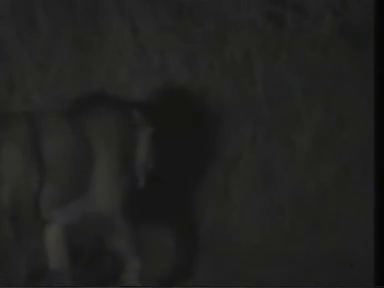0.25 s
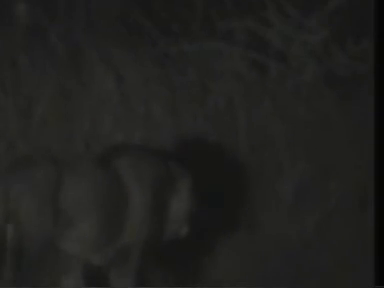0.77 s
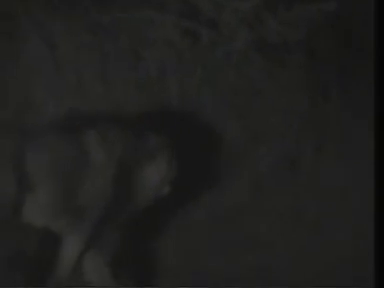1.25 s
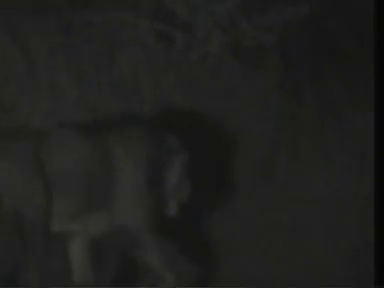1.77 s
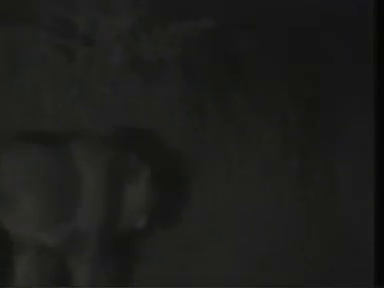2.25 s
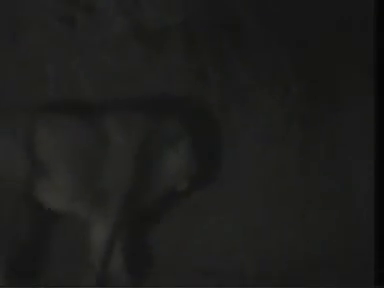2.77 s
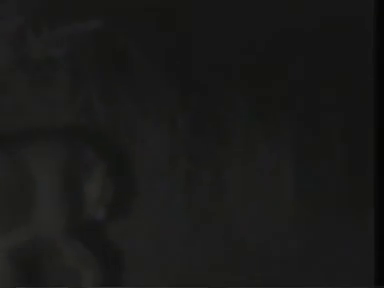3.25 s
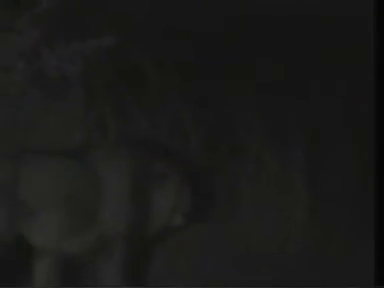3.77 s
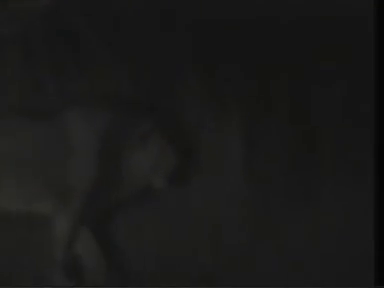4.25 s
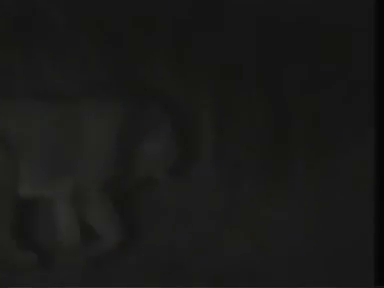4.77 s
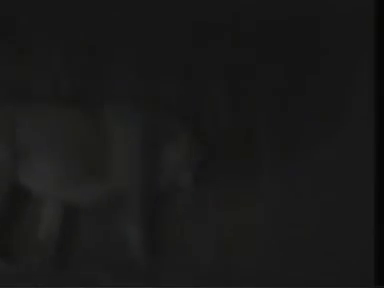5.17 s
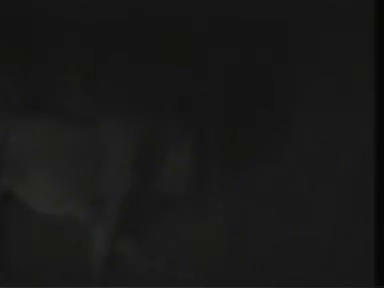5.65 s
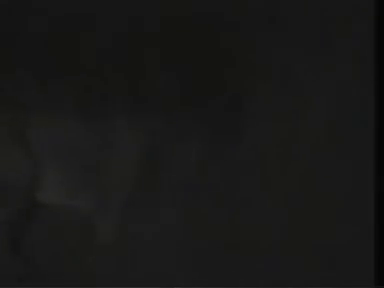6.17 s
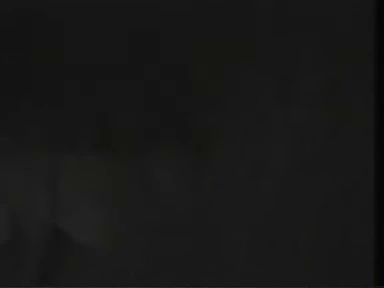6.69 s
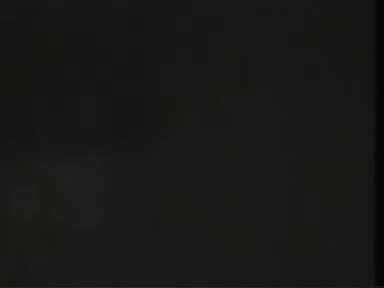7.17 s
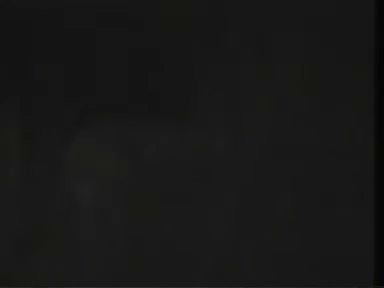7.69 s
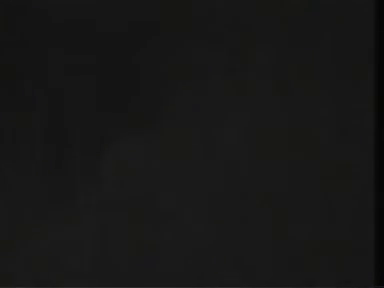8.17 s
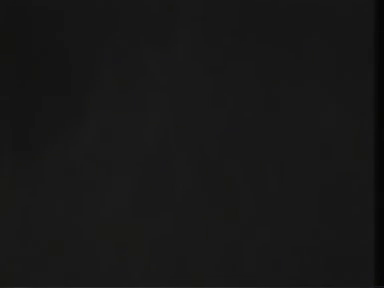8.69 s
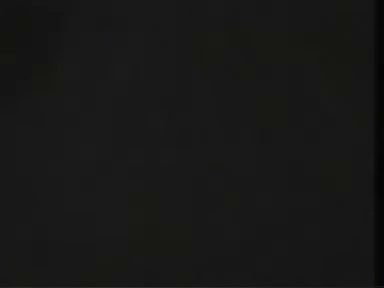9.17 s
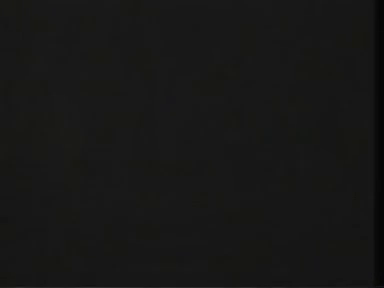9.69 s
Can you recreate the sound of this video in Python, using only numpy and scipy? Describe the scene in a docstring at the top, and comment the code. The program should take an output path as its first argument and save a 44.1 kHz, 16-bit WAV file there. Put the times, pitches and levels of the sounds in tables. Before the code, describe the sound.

In open scrub at night a lion gives three deep, rough roars, each falling in pitch and ending breathy, then eight short, throaty grunts at regular intervals. The sound is close and dry with only a brief dull echo. Near the microphone a small motor hums, whirrs and ticks softly, with a few low bumps and two clicks. Nearly everything sits on the right; the left has only faint hiss and whistle.

```python
"""A lion calls at night: three long roars, then eight short grunts. Its heavy vocal folds give a deep, nearly
pure tone; a rasp of half-pitch overtones and turbulent puffs resonates in the long throat and open mouth,
and air rushes late in each call. Near the microphone a small motor hums, whines, whirrs and ticks, built
from steady tones and shaped noise, with a few decaying bass bumps and two noise clicks. All this is on the
right, with a thin high tone; the left carries only faint electronic hiss and whistle."""
import sys
import numpy as np
from scipy import signal
from scipy.fft import rfft, irfft, next_fast_len
from scipy.io import wavfile
from scipy.ndimage import map_coordinates

SR = 44100
rng = np.random.default_rng(int(sys.argv[2]) if len(sys.argv) > 2 else 0)


def generate_wav(sig):
    """Save sig (samples, or channels by samples) to the path in sys.argv[1] as 16-bit PCM at SR."""
    pcm = np.round(np.clip(np.atleast_2d(sig).T, -1, 1) * 32767).astype(np.int16)
    wavfile.write(sys.argv[1], SR, pcm)


N = 437913

# All source levels are relative: scene() doubles their sum.
REST_HZ = 165  # pitch at which the tract resonances keep their listed frequencies


def amp(db):
    """Decibels to amplitude ratio."""
    return 10 ** (np.asarray(db) / 20)


def unit(x):
    """Normalisation to unit rms."""
    return x / np.sqrt(np.mean(x ** 2) + 1e-20)


def clock():
    """Time in seconds at every sample."""
    return np.arange(N) / SR


def wobble(rate):
    """Band-limited randomness: a smooth curve through rate random knots a second."""
    knots = rng.standard_normal(8192)
    return map_coordinates(knots, [clock() * rate], mode="wrap")


def filtered(x, response):
    """Linear filtering: the spectrum of x times a complex response of frequency."""
    m = next_fast_len(N + SR // 2)
    return irfft(rfft(x, m) * response(np.fft.rfftfreq(m, 1 / SR)), m)[..., :N]


def coloured(x, points):
    """Spectral shaping by (f/Hz, level/dB) points on a log frequency axis, at unit rms."""
    f, db = np.transpose(points)
    return unit(filtered(x, lambda hz: amp(np.interp(np.log(hz + 1), np.log(f), db))))


def resonances(modes, f):
    """Modal superposition of (f/Hz, width/Hz, level/dB) resonances of alternating sign."""
    total = 0
    for k, (centre, width, db) in enumerate(modes):
        damping = 1j * f * width
        total = total + (-1) ** k * amp(db) * damping / (centre * centre - f * f + damping)
    return total


def cavity(x, modes, low_hz, high_hz, order=1):
    """Cavity resonance between two steep band edges, at unit rms; order 2 deepens the valleys."""
    def response(f):
        low_edge = 1 - 1 / (1 + (f / low_hz) ** 6)
        high_edge = 1 + (f / high_hz) ** 6
        return resonances(modes, f) ** order * low_edge / high_edge
    return unit(filtered(x, response))


def tones(lines, drift, waver_db=0):
    """Additive synthesis of (f/Hz, rms level/dB) lines that wander by drift radians and by waver_db."""
    t, knots = clock(), np.arange(100) / 10

    def wander():
        return np.interp(t, knots, rng.standard_normal(len(knots)))

    total = 0
    for hz, db in lines:
        level = np.sqrt(2) * amp(db + waver_db * wander())
        total = total + level * np.sin(2 * np.pi * hz * t + drift * wander())
    return total


def motor():
    """Rotating machinery radiates tones, a hum that swells with its load, and whirr resonant in a casing."""
    # level of the low hum: t/s, level/dB
    hum_swell = [(0, -90), (0.8, -63.5), (2.4, -54.5), (3.5, -52.5), (5.3, -58), (7.3, -51), (8.6, -60),
                 (9.55, -50), (9.93, -56.5)]
    # lines of the hum, relative to its level: f/Hz, level/dB
    hum_lines = [(419.7, 0), (448, -11), (474, -13), (893, -13)]
    # gear whine, before its slow growth: f/Hz, level/dB
    whine_lines = [(1168, -72), (1981, -85), (2008, -69.5), (2229, -81.5), (2627, -72), (2670, -68.5),
                   (2842, -78.5), (2896, -66), (3338, -66), (3531, -72), (4005, -79), (4452, -76)]
    # motor tones that the casing lifts, before the same growth: f/Hz, level/dB
    shrill_lines = [(6207, -68), (6255, -76), (6428, -73.5), (6481, -73)]
    # spectrum of the whirr: f/Hz, relative level/dB per Hz
    whirr_spectrum = [(1060, -16.5), (1800, -8.5), (2600, -5), (3070, -4.5), (3460, -3), (3760, -9.5),
                      (5200, -15.5), (6760, -5.5), (11400, -120)]
    # casing resonances that the motor shakes: f/Hz, width/Hz, relative level/dB
    casing_modes = [(6380, 750, 0), (9580, 650, -14)]
    # two low tones that beat: f/Hz, level/dB
    drone_lines = [(147, -62), (163.5, -66.5)]
    hum = amp(np.interp(clock(), *np.transpose(hum_swell)))
    growth = amp(-4 + 0.69 * clock())  # dB, dB per s
    whirr = amp(-57) * coloured(rng.standard_normal(N), whirr_spectrum)
    whirr += amp(-66.0) * cavity(rng.standard_normal(N), casing_modes, low_hz=4100, high_hz=12100)
    gears = tones(whine_lines, drift=0.65, waver_db=3.5) + tones(shrill_lines, drift=1.0, waver_db=3.0)
    flicker = amp(1.5 * wobble(60))
    sound = hum * tones(hum_lines, drift=0.29)
    sound += growth * (gears + whirr * flicker)
    return sound + tones(drone_lines, drift=1.0)


def ticking():
    """Periodic amplitude modulation: the mechanism ticks softly and fast, most clearly at the start."""
    steady_db, extra_db, fade_s = -57, 4, 2  # the extra level at the start fades
    tick_hz, first_s = 16.8, 0.024
    t = clock()
    beats = ((1 + np.cos(2 * np.pi * tick_hz * (t - first_s))) / 2) ** 2
    spectrum = [(150, -44.5), (500, 10.5), (900, 1), (1500, -1.5), (2500, -38), (8000, -42)]
    rustle = coloured(rng.standard_normal(N), spectrum)
    return amp(steady_db + extra_db * np.exp(-(t / fade_s) ** 2)) * beats * rustle


def night():
    """Stationary coloured noise for still air, with a faint uneven rumble."""
    # spectrum of the still air: f/Hz, relative level/dB per Hz
    air_spectrum = [(20, -7.5), (40, -3), (75, -3), (120, 3), (155, 10), (200, 1.5), (500, 0), (800, -2.5),
                    (1500, -6), (2500, -14.5), (8000, -19.5), (12000, -24.5), (15000, -56)]
    rumble_spectrum = [(12, -17.5), (35, -14.5), (70, -9.5), (140, -22.5), (400, -68.5)]
    rumble = coloured(rng.standard_normal(N), rumble_spectrum)
    rumble_db = -60 - 0.7 * clock() + 3 * wobble(4.6)  # sinks by 0.7 dB per s
    return amp(-53.5) * coloured(rng.standard_normal(N), air_spectrum) + amp(rumble_db) * rumble


def knocks():
    """Impulse response: bumps push the microphone as decaying bass; clicks are a bright snap and a rattle."""
    # bumps, before a common lift: t/s, level/dB
    bump_times = [(0.204, -42), (0.406, -43), (0.558, -48), (0.872, -38), (1.93, -44.5), (2.0, -50),
                  (2.345, -41.5), (4.16, -41), (4.755, -38)]
    # clicks, before a common lift: t/s, rattle level/dB, rattle 60 dB decay time/s, snap level/dB
    click_times = [(6.493, -36.5, 0.29, -37.5), (9.38, -27.5, 0.062, -37)]
    # resonances of the duller rattle: f/Hz, width/Hz, level/dB
    rattle_modes = [(570.1, 500, 2), (1010, 640, -2.5)]
    # resonances of the snap: f/Hz, width/Hz, level/dB
    snap_modes = [(1130, 730, 0.5), (1860, 520, 1.5), (5500, 5000, -27.5)]
    bump_hz, bump_t60, bump_rise_s, snap_t60 = 54.3, 0.094, 0.0017, 0.064
    bump_lift_db, click_lift_db = 7, 10.5
    bumps, rattles, snaps = np.zeros((3, N))
    t = np.arange(SR // 4) / SR
    push = np.sin(2 * np.pi * bump_hz * t) * (1 - np.exp(-t / bump_rise_s))
    for s, db in bump_times:
        bumps[round(s * SR):][:len(t)] += amp(db + bump_lift_db - 60 * t / bump_t60) * push
    for s, db, t60, snap_db in click_times:
        first = round(s * SR)
        rattles[first:][:len(t)] += amp(db - 60 * t / t60) * rng.standard_normal(len(t))
        snaps[first:][:len(t)] += amp(snap_db - 60 * t / snap_t60) * rng.standard_normal(len(t))
    clicks = filtered(rattles, lambda f: resonances(rattle_modes, f))
    clicks += filtered(snaps, lambda f: resonances(snap_modes, f))
    return bumps + amp(click_lift_db) * clicks


def tract(x, modes, scale, low_hz, high_hz):
    """Scaling of resonance with length: a cavity rings on a clock that runs faster by scale."""
    ticks, own = np.arange(N), np.cumsum(scale)
    ringing = cavity(np.interp(ticks, own, x), modes, low_hz, high_hz, order=2)
    return unit(np.interp(own, ticks, ringing))


def overtones(cycles, blur, count=7):
    """Period doubling: lines at 1.5, 2, 2.5 .. times the pitch, each slipping in phase by blur radians."""
    t, knots = clock(), np.arange(900) / 90
    total = 0
    for k in range(3, 3 + count):
        start = rng.uniform(0, 2 * np.pi)
        slip = np.interp(t, knots, rng.standard_normal(len(knots)))
        total = total + np.cos(np.pi * k * cycles + start + blur * slip)
    return unit(total)


def lion(controls, throat, mouth, glide, blur, jitter, flap, rasp_noise_db):
    """Source and filter: vocal folds swing at the pitch; the harder they rasp, the less regular they are."""
    # spectrum of the rushing air: f/Hz, relative level/dB per Hz
    air_spectrum = [(700, -42.5), (1800, 3.5), (2300, 7.5), (3000, 2.5), (4300, 1.5), (5500, -6),
                    (8000, -14.5), (12000, -19.5), (16000, -44.5)]
    # the resonance that stands out as the jaw closes: f/Hz, width/Hz, relative level/dB
    narrow_modes = [(1540, 210, 0)]
    pitch, tone, rasp, opening, air, narrowing = controls
    rough = np.clip(1.25 * rasp / (tone + 1e-6), .15, 1)  # irregularity of the folds
    cycles = np.cumsum(pitch * (1 + jitter * rough * wobble(130))) / SR
    # loose tissue flaps about once in three cycles and chops the airflow
    flapping = np.cos(2 * np.pi * cycles / 3 + 0.61 * wobble(16))
    shimmer = 1.22 * rough * (wobble(70) + flapping / 2)
    swing = np.sqrt(2) * np.sin(2 * np.pi * cycles) * (1 + shimmer) / np.sqrt(1 + rough ** 2 / 2)
    # each closure of the folds is a pulse, with a puff of turbulence
    closures = unit(np.diff(np.floor(cycles + 0.068 * wobble(220)), prepend=0))
    gusts = (1 + 0.27 * np.cos(2 * np.pi * cycles)) * (1 + flap * flapping)
    puffs = unit(rng.standard_normal(N) * gusts)
    growl = overtones(cycles, blur) + amp(rasp_noise_db) * puffs
    breath = closures / 2 + puffs
    # the larynx sinks as the pitch falls: the throat lengthens and its resonances drop
    scale = (pitch / REST_HZ) ** glide
    voice = tone * swing
    voice += rasp * tract(growl, throat, scale, low_hz=138, high_hz=900)
    voice += opening * tract(breath, mouth, scale, low_hz=695, high_hz=2900)
    voice += narrowing * cavity(breath, narrow_modes, low_hz=1100, high_hz=2100)
    voice += air * coloured(puffs, air_spectrum)
    # a mouth radiates the deepest bass poorly
    return filtered(voice, lambda f: 1 - 1 / (1 + (f / 90) ** 6))


def current(calls):
    """Sequencing: seconds since the start of the call at hand, then its other columns, at every sample."""
    calls = np.array(calls)
    row = np.searchsorted(calls[1:, 0] - .1, clock())  # a call takes over 0.1 s before its start
    start, *columns = calls[row].T
    return clock() - start, *columns


def envelope(t, attack_s, hold_s, release_db_per_s):
    """Exponential decay: a rounded attack, a hold until hold_s and an even fall in dB."""
    onset_db = 16.5  # depth under the peak at the start of a call
    attack = onset_db * np.maximum(1 - t / attack_s, 0) ** 2
    return amp(-attack - release_db_per_s * np.maximum(t - hold_s, 0))


def roar_controls():
    """Vocal effort: the higher the pitch is pushed, the louder rasp, mouth and air; gives pitch and gains."""
    # the breath behind each roar: start t/s, length/s, attack/s (before each layer's factor), sag/dB per s,
    # last push/dB, then rasp, mouth and air level/dB (before breath and effort)
    breaths = [(0.88, 0.65, 0.14, 2, 1.5, -34.5, -47.5, -54.5),
               (2.4, 0.41, 0.11, 7.5, 5, -35.5, -46.5, -55.5),
               (3.59, 0.37, 0.07, 8, 0.5, -36.5, -51, -54.5)]
    # one curve for each roar: t/s, pitch f/Hz, deep tone level/dB
    curves = [
        [(0.87, 168, -53), (0.905, 181.5, -25.5), (0.94, 203, -18), (0.97, 225.3, -27), (1.03, 219.9, -25.5),
         (1.08, 192, -21.5), (1.14, 175.6, -19), (1.21, 173.8, -20.5), (1.4, 165.4, -20.5),
         (1.58, 139.2, -36.5), (1.67, 123.7, -53.5)],
        [(2.39, 165.9, -63.5), (2.43, 182, -25.5), (2.46, 185.2, -17.5), (2.52, 186.9, -21.5),
         (2.57, 172.8, -17.5), (2.66, 155.5, -20), (2.775, 157.8, -23), (2.79, 150.8, -41), (2.85, 130, -41),
         (2.9, 123.2, -57)],
        [(3.58, 171.8, -50), (3.62, 182.2, -26), (3.69, 193.4, -25.5), (3.73, 169.5, -22.5), (3.77, 157, -25),
         (3.82, 148.5, -34.5), (3.95, 134, -31), (4.04, 126, -50)],
    ]
    # rasp, mouth, air: attack over the roar's attack, dB per octave of pitch, release in dB per s
    responses = (0.901, 16.9, 160), (1.5, 18.4, 200), (1.56, 10, 150)
    push_half_s = 0.036  # half the length of the last push of breath
    now = clock()
    s, hz, db = np.transpose(np.concatenate(curves))
    pitch = np.interp(now, s, hz)
    sounding = 0
    for curve in curves:
        inside_s = np.minimum(now - curve[0][0], curve[-1][0] - now)
        sounding = sounding + np.clip(inside_s / .015, 0, 1)
    tone = sounding * amp(np.interp(now, s, db))
    effort = np.log2(pitch / REST_HZ)
    t, length, attack_s, sag, push_db, *levels = current(breaths)
    breath_db = push_db * np.exp(-((t - length + push_half_s) / push_half_s) ** 2) - sag * t
    layers = []
    for level, (lag, per_octave, release) in zip(levels, responses):
        gain = amp(level + breath_db + per_octave * effort)
        layers.append(gain * envelope(t, lag * attack_s, length, release))
    narrowing = amp(-61.5) * envelope(t, 0.49, length, 164)
    return pitch, tone, *layers, narrowing


def roars():
    """Tract resonance of the long calls: throat and open mouth filter a strained voice."""
    # levels count twice, since the tract squares its response; frequencies are those at REST_HZ
    # long throat: f/Hz, width/Hz, relative level/dB
    throat = [(239, 90, 1), (425, 70, 3), (621, 158, -2)]
    # open mouth: f/Hz, width/Hz, relative level/dB
    mouth = [(929, 83, 5.5), (1190, 137, 6.5), (1442, 490, 2), (2080, 290, -4)]
    return lion(roar_controls(), throat, mouth,
                glide=0.14, blur=1.0, jitter=0.0633, flap=0.39, rasp_noise_db=11.5)


def grunt_controls():
    """Pitch arch: the tone leads and catches briefly; rasp, open mouth and air follow; the jaw closes."""
    # start t/s, length/s, top pitch f/Hz, then tone, rasp, mouth, air and narrowed mouth level/dB,
    # moment of the catch after the start t/s, its depth/dB
    calls = [ (4.616, 0.24, 177.6, -19.5, -33.5, -50, -48, -69, 0.095, 18),
             (5.425, 0.275, 190.6, -21.5, -35, -44, -50, -55, 0.085, 3),
             (6.217, 0.25, 178.3, -19, -35.5, -42, -50.5, -57, 0.1033, 8),
             (6.961, 0.24, 176.5, -19, -35.5, -42.5, -50, -51, 0.067, 9),
             (7.665, 0.22, 171, -19.5, -33.5, -42, -46, -54, 0.1124, 4.5),
             (8.349, 0.222, 172.1, -18.5, -36.5, -41, -49.5, -50.5, 0.0673, 8),
             (9.012, 0.22, 168.2, -20.5, -38.5, -43, -49.5, -54.5, 0.068, 4),
             (9.663, 0.21, 171.4, -19.5, -38, -44, -52, -49, 0.079, 15.5), ]
    # tone, rasp, mouth, air, narrowed mouth: attack end and hold end over the length, release in dB per s
    shapes = (0.2274, 0.45, 296.5), (0.4, 0.56, 190), (0.33, 0.41, 190), (0.71, 0.6, 270), (0.6, 0.69, 190)
    catch_half_s = 0.008  # half the time for which the folds lose their swing
    tail_db, tail_hold, tail_release = -16, 0.85, 417  # a weak tone lingers: dB, share of length, dB per s
    t, length, top_hz, *levels, catch_s, catch_db = current(calls)
    # top at 0.27 of the length; start and end pitch over the top pitch
    pitch = top_hz * np.interp(t / length, [0, 0.27, 1], [0.88, 1, 0.75])
    layers = []
    for level, (attack, hold, release) in zip(levels, shapes):
        layers.append(amp(level) * envelope(t, attack * length, hold * length, release))
    tone, *noisy = layers
    catch = amp(-catch_db * np.exp(-((t - catch_s) / catch_half_s) ** 2))
    tail = amp(levels[0] + tail_db) * envelope(t, length / 2, tail_hold * length, tail_release)
    return pitch, np.maximum(tone * catch, tail), *noisy


def grunts():
    """Tract resonance of the short calls: throat and open mouth filter a brief voice."""
    # levels count twice, since the tract squares its response; frequencies are those at REST_HZ
    # long throat: f/Hz, width/Hz, relative level/dB
    throat = [(225.6, 64, 1), (425, 71, 2), (636, 180, -5.5)]
    # open mouth: f/Hz, width/Hz, relative level/dB
    mouth = [(882, 118, 3.5), (1238, 220, 2), (1462, 313, -1), (2240, 220, -7)]
    return lion(grunt_controls(), throat, mouth,
                glide=0.085, blur=0.97, jitter=0.09, flap=0.37, rasp_noise_db=13)


def bush(x, t60, wet_db):
    """Diffuse scattering: ground and scrub return a short, dull answer."""
    t = np.arange(SR // 2) / SR
    tail = rng.standard_normal(len(t)) * amp(-60 * t / t60) * (t > .012)
    echo = signal.fftconvolve(x, tail / np.linalg.norm(tail))[:N]
    return x + amp(wet_db) * filtered(echo, lambda f: 1 / (1 + 1j * f / 2500))


def scene():
    """Superposition: the lion in the scrub and the sounds near the microphone add up on the right."""
    calls = bush(roars() + grunts(), t60=0.17, wet_db=-18)
    sound = calls + motor() + ticking() + knocks() + night()
    return np.array([np.zeros(N), 2 * sound])


def record(dry):
    """Band limitation: the left hisses and whistles, the right has a thin high tone, and both end at top_hz."""
    # electronic tones on the left: f/Hz, level/dB
    whistle_lines = [(388, -82), (775.5, -66.5), (12435, -69.5), (14360, -85.5), (15625, -95.5)]
    top_hz = 15760
    left = amp(-60.0) * rng.standard_normal(N) + tones(whistle_lines, drift=.03)
    right = tones([(15623, -77)], drift=.2)
    return filtered(dry + np.array([left, right]), lambda hz: hz < top_hz)


dry = scene()
out = record(dry)
generate_wav(out)
```